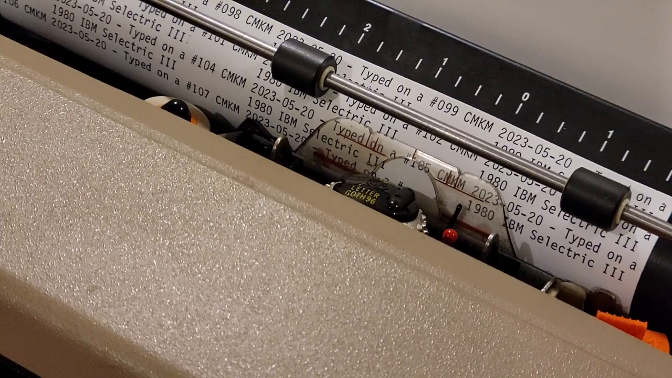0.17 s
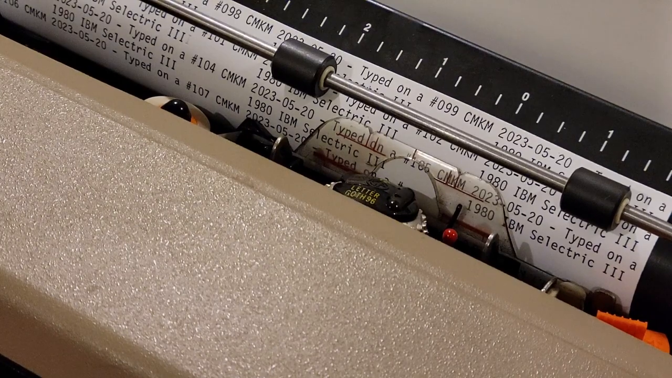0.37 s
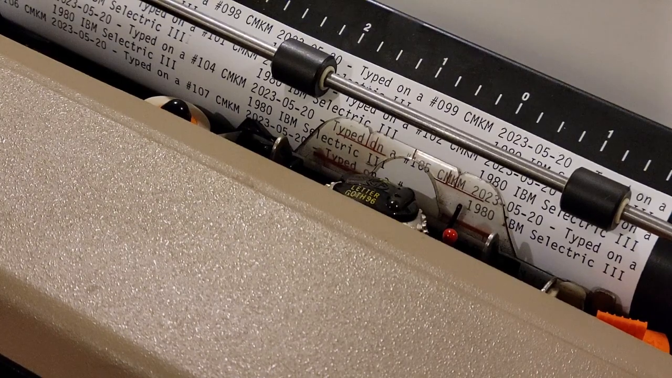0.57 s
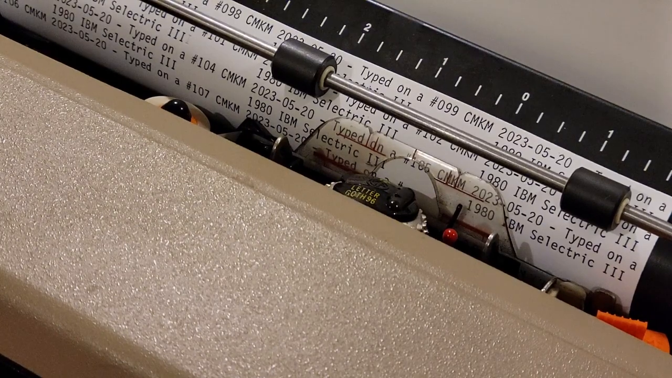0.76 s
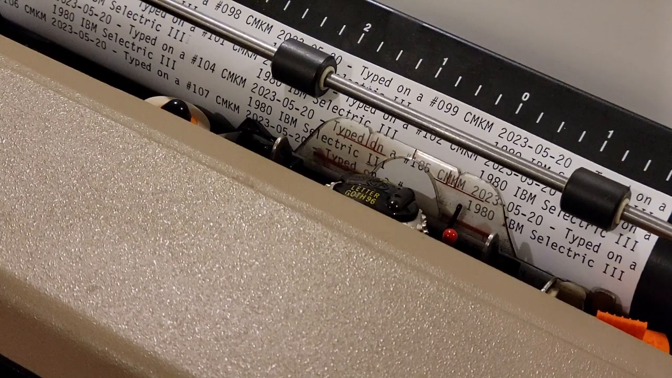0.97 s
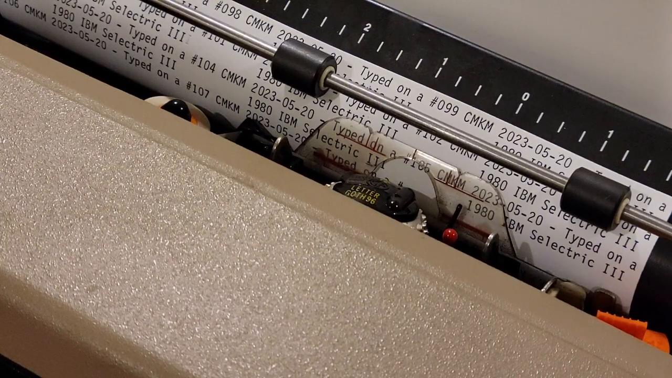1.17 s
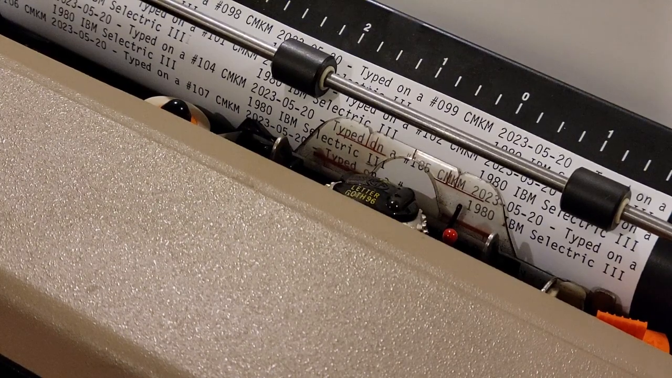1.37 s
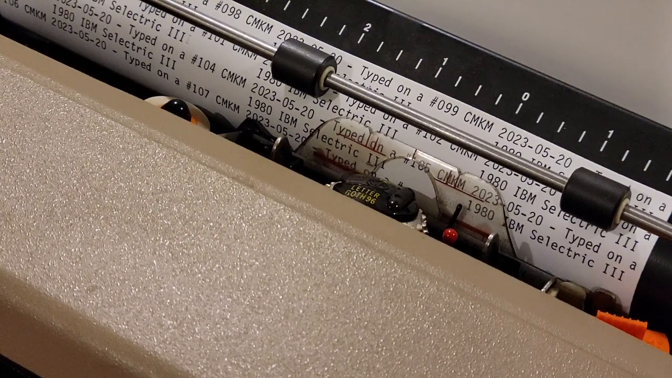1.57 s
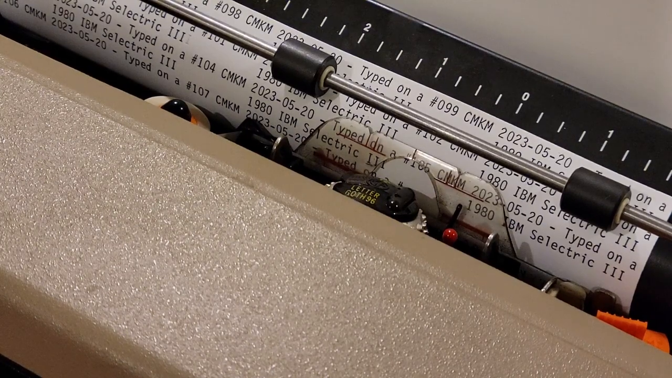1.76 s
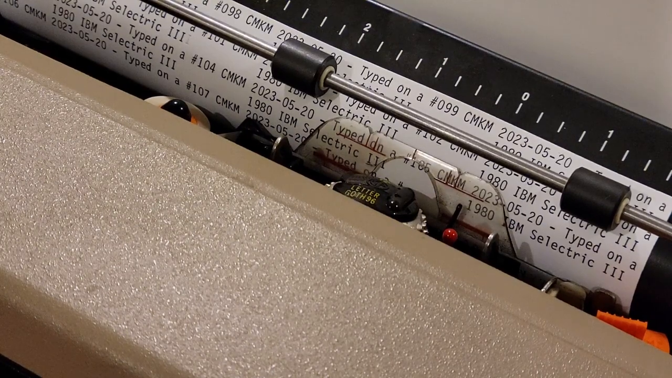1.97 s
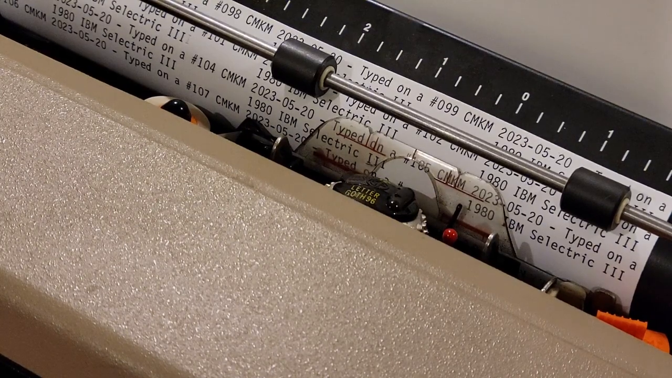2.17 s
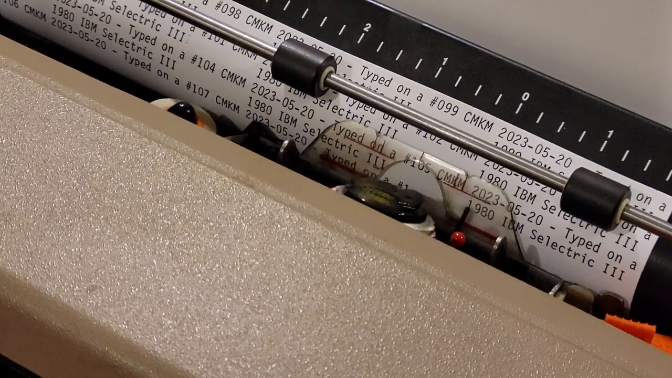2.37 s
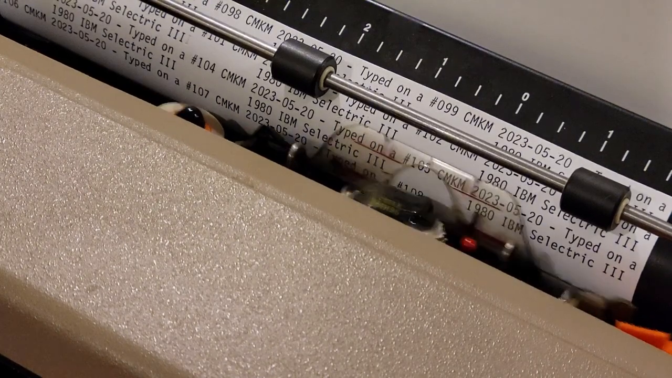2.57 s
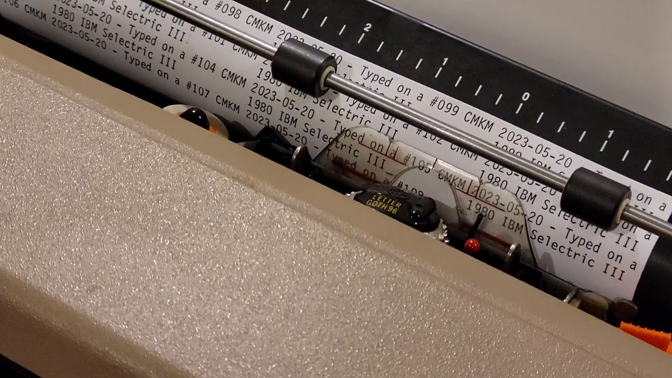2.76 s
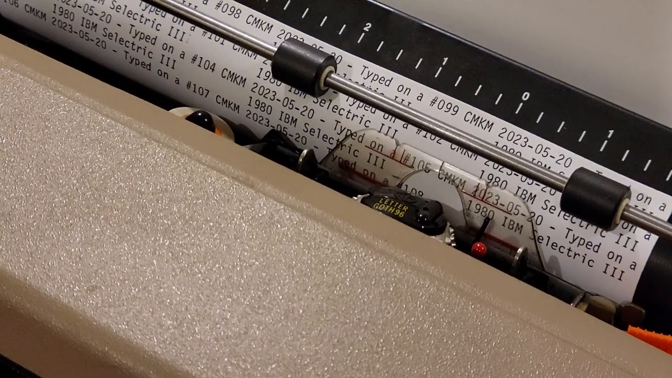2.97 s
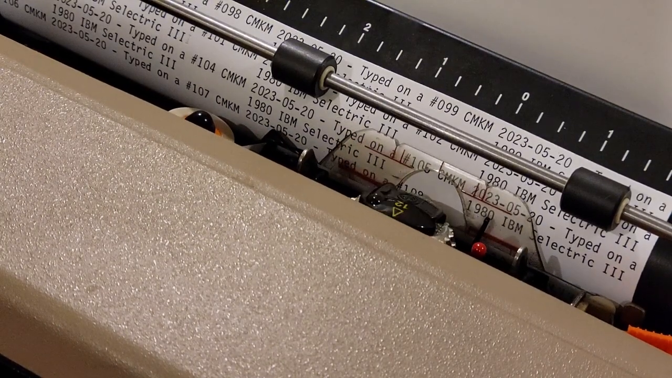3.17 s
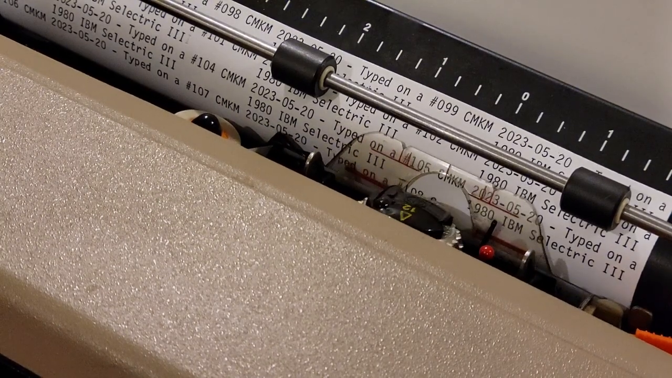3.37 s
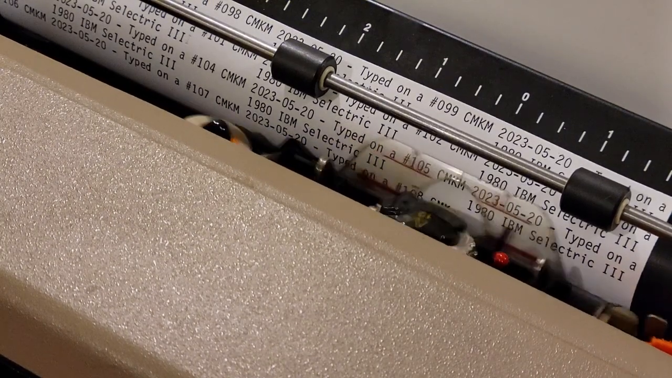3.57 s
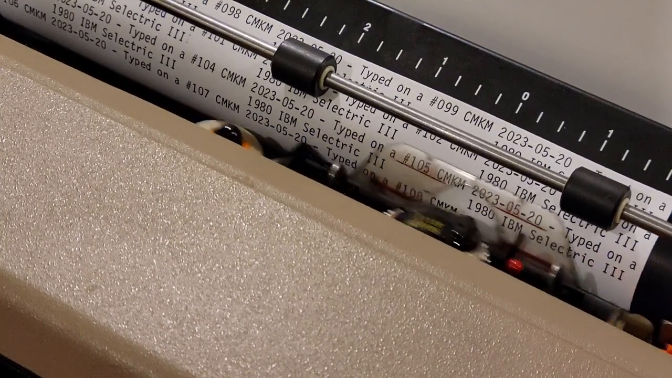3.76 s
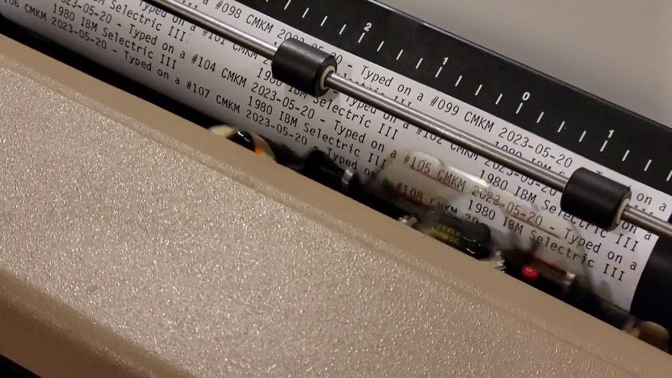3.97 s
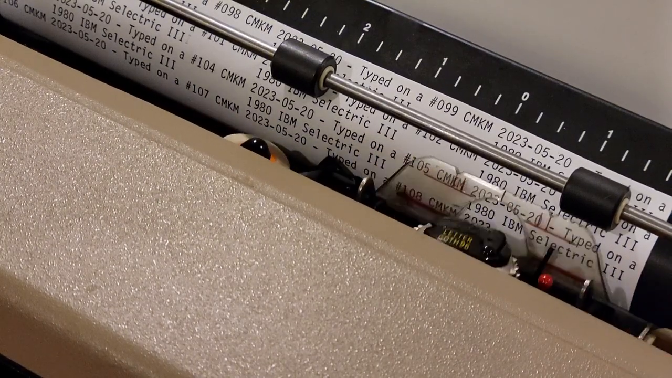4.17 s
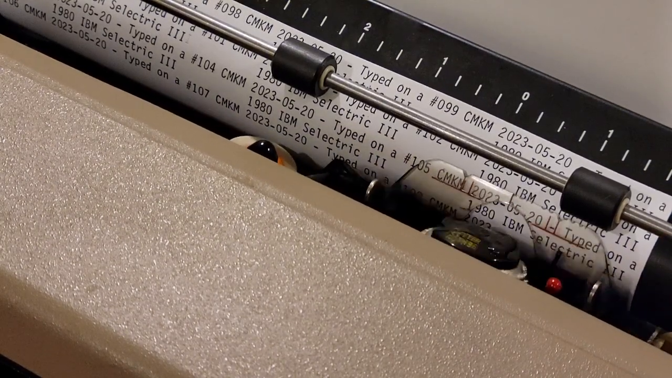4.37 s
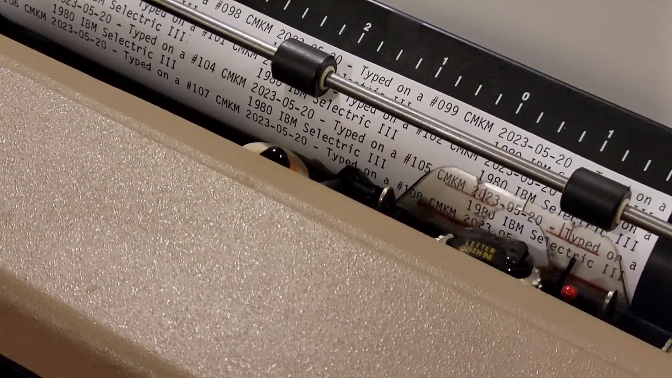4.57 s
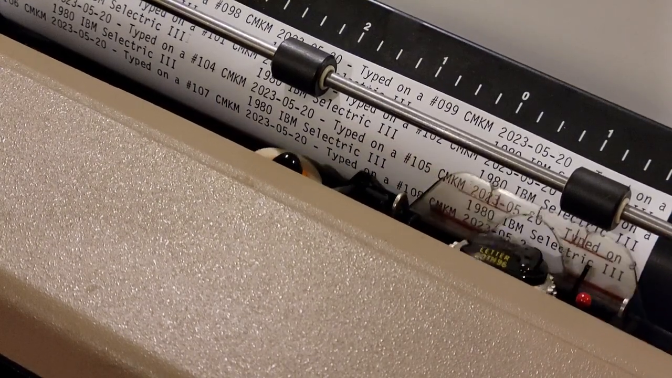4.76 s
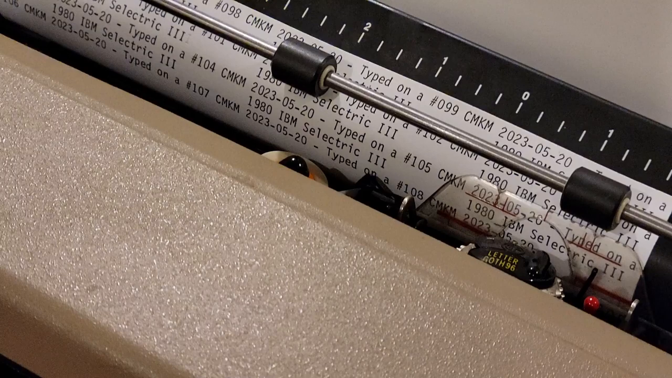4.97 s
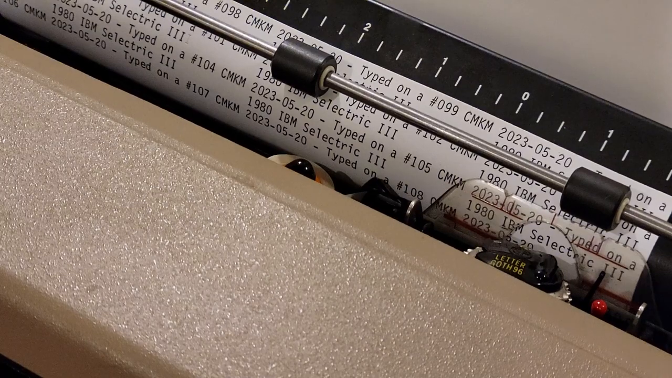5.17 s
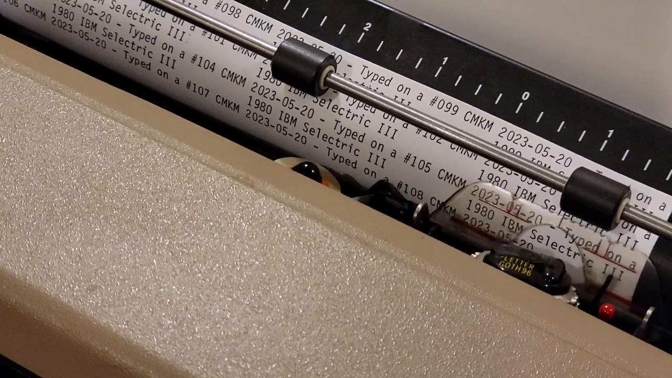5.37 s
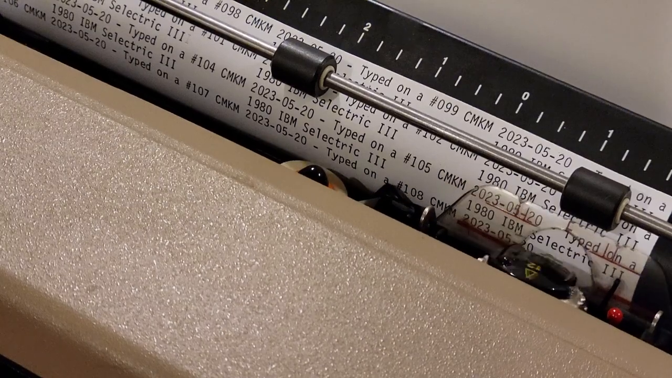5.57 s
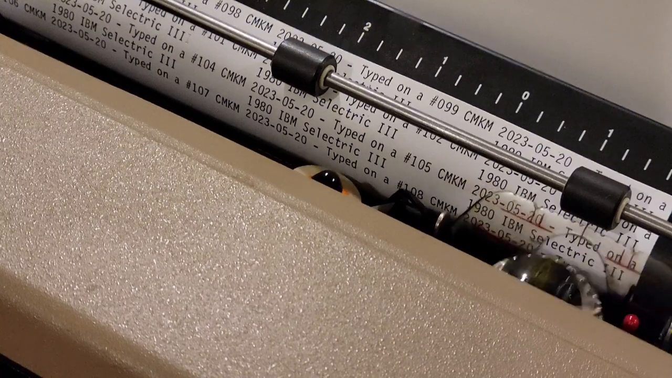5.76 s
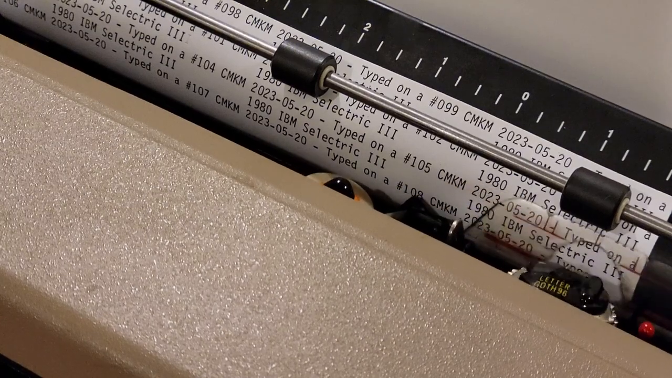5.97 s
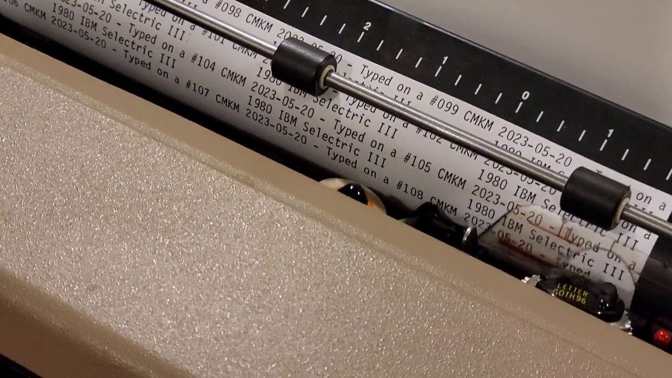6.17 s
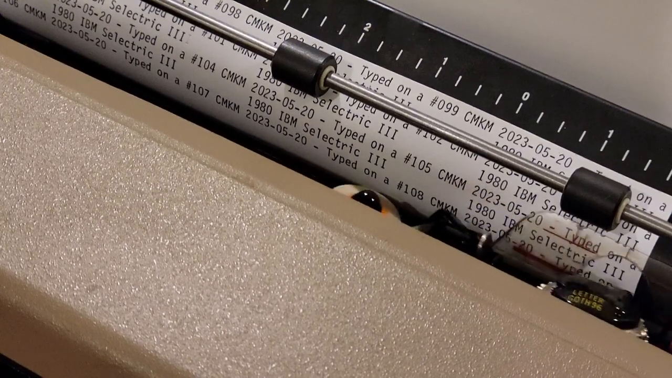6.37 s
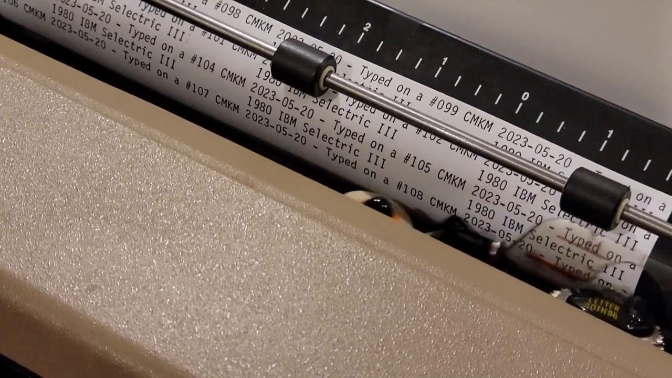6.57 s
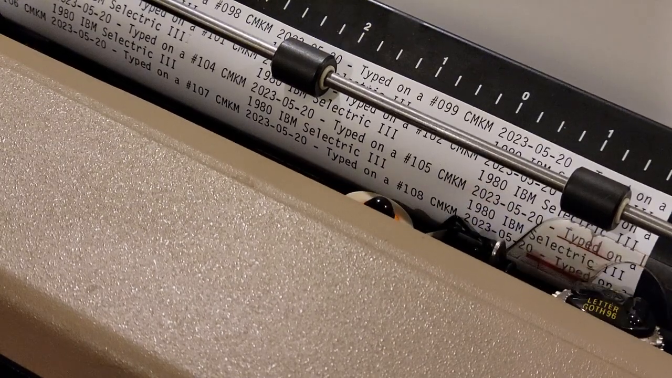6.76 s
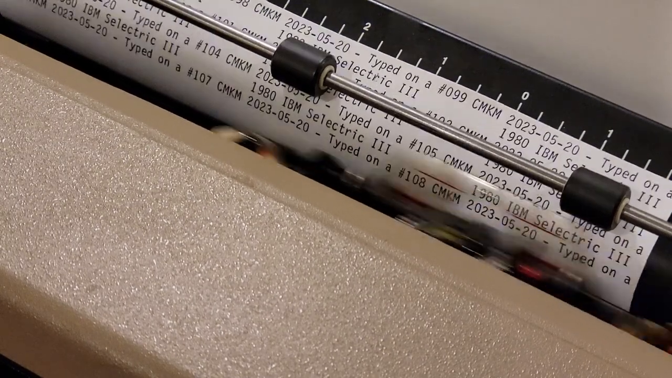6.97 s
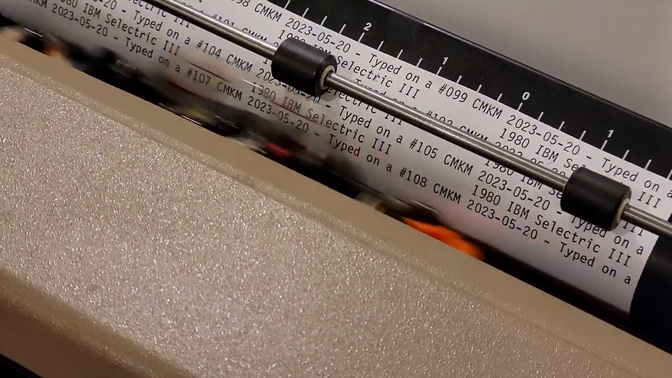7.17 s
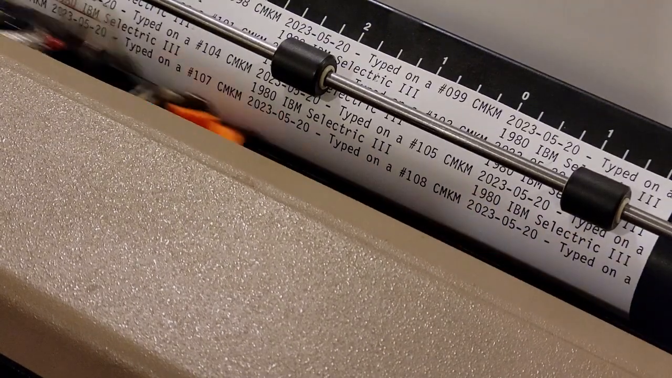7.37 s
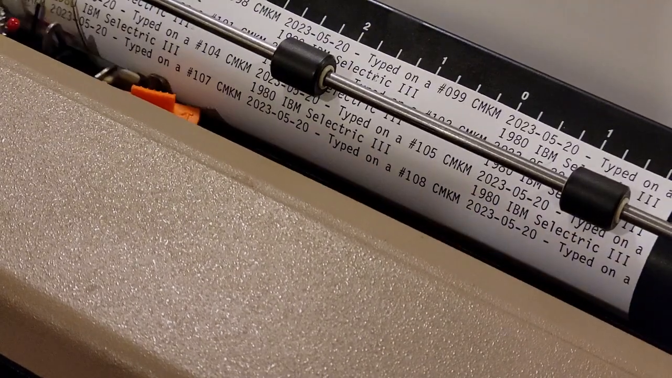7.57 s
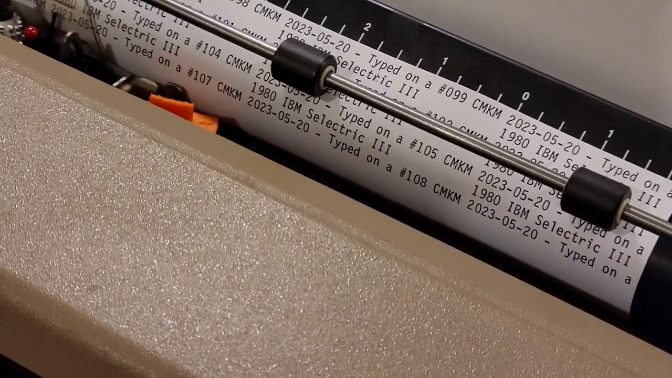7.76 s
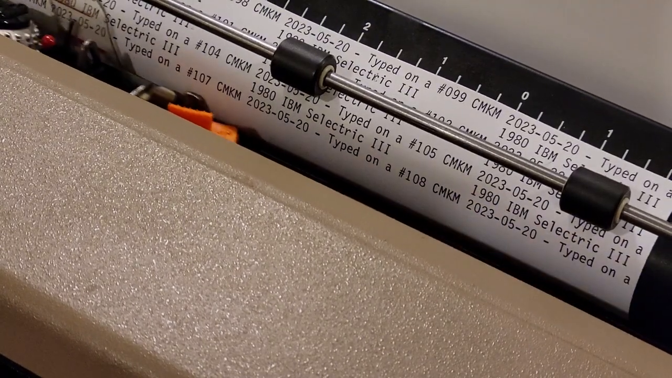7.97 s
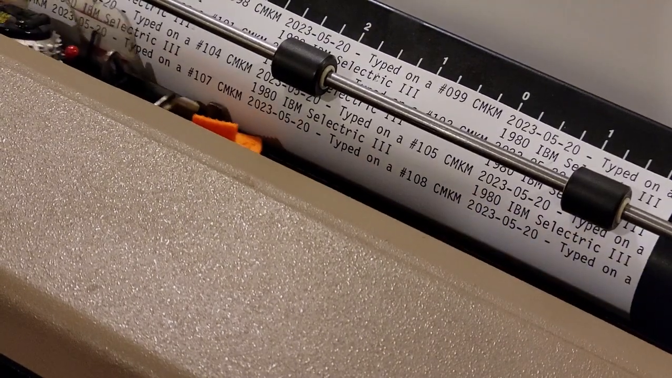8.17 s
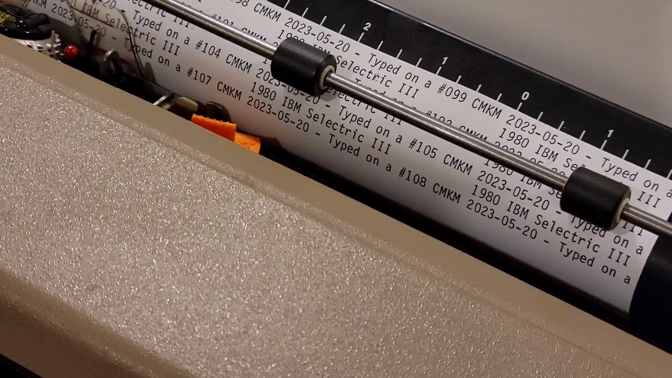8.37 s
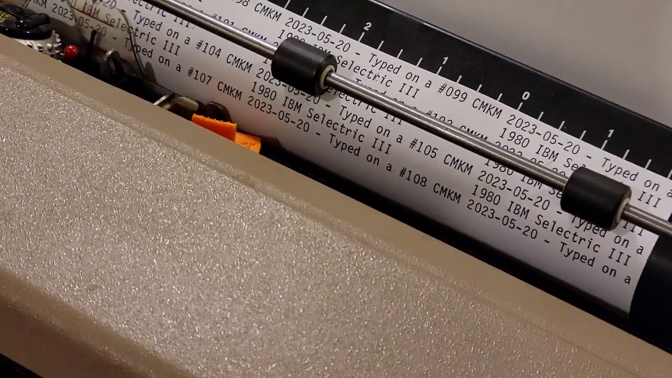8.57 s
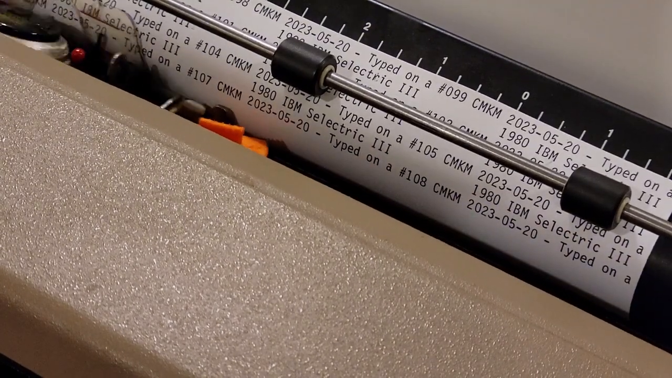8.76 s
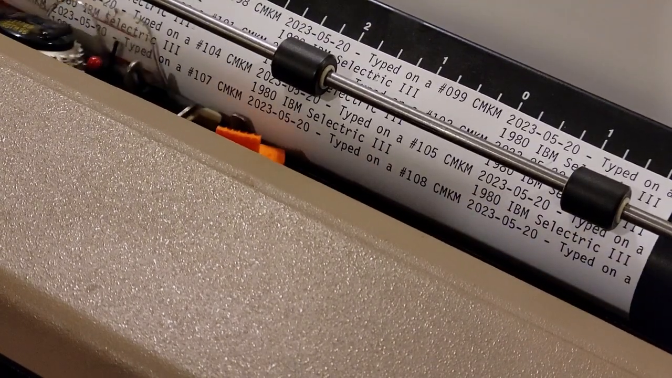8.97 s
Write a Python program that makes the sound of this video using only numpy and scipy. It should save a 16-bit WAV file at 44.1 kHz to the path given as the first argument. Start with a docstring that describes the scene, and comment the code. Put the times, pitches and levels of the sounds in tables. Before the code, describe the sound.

A close stereo perspective on an electric type-ball typewriter in a small room, with a short, quick-fading echo. A steady low motor hum and soft belt and fan rush run throughout. It idles until about 2.3 s, with only a barely audible tick near 0.9 s. Three sharp strikes follow to 2.6 s, then key clicks, a space clack and a ringing shift click near 3.2 s. From 3.35 to 6.6 s typing is dense and uneven: crisp steel snaps, rattling linkages, rubbery knocks, small ball rings and light frame thuds, with spaces between runs. At 6.8 s a key clicks; from 6.9 s the carrier whirs and slides in a rough flutter, clunking at the margin at 7.4 s. From 7.6 to 8.2 s ten even clacks rattle at about sixteen per second. Hum alone until 8.7 s, then four very rapid strikes by 8.95 s, settling into hum.

```python
"""In a small room, an electric type-ball typewriter works close by, its motor and belt humming.
For each character the clutch trips, linkages rattle, the ball hits the platen and the carrier steps on.
After a line the carrier whirs back to the margin, the space bar repeats, and typing resumes.
Clicks and the soft swells before them are short bursts of shaped noise; ringing parts are fading sines.
The motor is steady tones over a rush of air, and fading noise makes the room's echo."""
import sys
import numpy as np
from scipy import signal
from scipy.fft import rfft, irfft, next_fast_len
from scipy.io import wavfile
from scipy.ndimage import map_coordinates

SR = 44100
rng = np.random.default_rng(int(sys.argv[2]) if len(sys.argv) > 2 else 0)


def wav_record(signal):
    """Record a signal, one row per channel, as 16-bit PCM in the file named by sys.argv[1]."""
    frames = np.transpose(np.atleast_2d(signal))
    bounded = np.clip(frames, -1, 1)
    # unit amplitude maps onto the largest positive 16-bit level
    quanta = np.round(bounded * 32767).astype(np.int16)
    wavfile.write(sys.argv[1], SR, quanta)


N = 397782
T = np.arange(N) / SR
AGE = np.arange(SR // 2) / SR  # time since a contact [s]
SWELL_SAMPLES = SR // 40  # length of the swell of noise before a contact

# ways the rubber platen rings: (pitch [Hz], relative level [dB], time to fall 60 dB [s])
PLATEN = [(344.5, -7.5, 0.09), (440, 3, 0.04), (494, -1.5, 0.039), (615, -14.5, 0.042),
          (755, -13.5, 0.0345), (1045, -6.5, 0.029), (1312, -10, 0.053)]
# ways the frame rings: (pitch [Hz], relative level [dB], time to fall 60 dB [s])
FRAME = [(28.6, -16.5, 0.72), (46, -12, 0.42), (77.8, -2, 0.29), (114, -6.5, .13), (154.8, -4, 0.21),
         (270, -6, .1), (322, -2, 0.27), (490, -3.5, 0.15)]

RATTLE_DB = -14  # base level of every character cycle: the motor drives each with the same force
# the return: key down, the cord takes hold, the carrier meets the margin
RETURN_KEY_S, RETURN_PULL_S, RETURN_STOP_S = 6.808, 6.9, 7.437


def amp(db):
    """Turn decibels into gain."""
    return 10 ** (np.asarray(db) / 20)


def unit(x):
    """Scale to an rms of 1."""
    return x / np.sqrt(np.mean(x ** 2) + 1e-20)


def along(points, hz):
    """Read a curve of (frequency [Hz], value) points on a log frequency axis."""
    f, v = np.transpose(points)
    return np.interp(np.log(hz + 1), np.log(f + 1), v)


def wobble(rate, size=N):
    """Draw a smooth random curve with this many random points a second."""
    knots = rng.standard_normal(int(size * rate / SR) + 4)
    return map_coordinates(knots, [np.arange(size) * rate / SR])


def filtered(x, response):
    """Multiply the spectrum of x by a response that depends on frequency."""
    m = next_fast_len(x.shape[-1] + 8192)
    spectrum = rfft(x, m) * response(np.fft.rfftfreq(m, 1 / SR))
    return irfft(spectrum, m)[..., :x.shape[-1]]


def coloured(x, spectrum):
    """Shape white noise or contacts by a spectrum while keeping the power of white noise."""
    return filtered(x, lambda hz: unit(amp(along(spectrum, hz))))


def spread(pair):
    """Turn two unrelated signals into left and right: alike in the bass, unrelated in the treble."""
    # how alike left and right are: (frequency [Hz], likeness [0 to 1])
    likeness = [(30, 0.54), (100, 0.94), (300, 0.88), (600, 0.51), (1200, 0.49), (2500, 0.21),
                (5000, 0.0062), (15000, 0.02)]

    def mid_side_gains(hz):
        turn = np.arccos(np.clip(along(likeness, hz), -1, 1)) / 2
        return np.array([np.cos(turn), np.sin(turn)])

    mid, side = filtered(pair, mid_side_gains)
    return np.array([mid + side, mid - side])


def add(track, s, sound):
    """Mix a sound into a track at time s."""
    start = round(s * SR)
    part = track[..., start:start + sound.shape[-1]]
    part += sound[..., :part.shape[-1]]


def chatter(t60, grain_db=1.5, case_db=-16.5, case_t60=0.11):
    """Steel parts chatter: a burst of tiny uneven contacts, in its own colour, lingers in the case."""
    t = AGE[:SR // 10]
    near, case = rng.standard_normal((2, 2, len(t)))
    resonances = unit(amp(3.2 * wobble(1500, size=len(t) // 2 + 1)))  # a random curve over frequency
    near = irfft(rfft(near) * resonances, len(t))
    grains = unit(amp(grain_db * np.clip(wobble(627, size=len(t)), -2, 2)))
    burst = near * grains * amp(-60 * t / t60)
    burst = burst + case * amp(case_db - 60 * t / case_t60)
    return burst * (1 - np.exp(-t / (0.012 * t60)))  # long rattles also start more softly


def ring(modes, vary_db, detune, attack_s=0.00046):
    """A struck part rings as fading sines, with slightly new strengths and pitches for every blow."""
    hz, db, t60 = np.transpose(modes)[..., None]
    t = AGE[AGE < t60.max()]
    size, pitch = rng.standard_normal((2, len(modes), 1))
    levels = amp(db + vary_db * size - 60 * t / t60)
    waves = levels * np.sin(2 * np.pi * hz * (1 + detune * pitch) * t)
    return waves.sum(axis=0) * (1 - np.exp(-t / attack_s))


def both(modes, vary_db, detune):
    """Ring a part separately for two channels, so that they differ a little."""
    return np.array([ring(modes, vary_db, detune) for _ in range(2)])


def swell_up_to(track, s, db, rise_t60=.04):
    """Soft noise swells briefly up to s."""
    t = AGE[:SWELL_SAMPLES]
    level = amp(3 * wobble(400, size=len(t)) - 60 * t[::-1] / rise_t60)
    noise = rng.standard_normal((2, len(t))) * level
    add(track, s - SWELL_SAMPLES / SR, amp(db) * noise)


def click(steel, linkage, s, bright_db, link_db):
    """One lever clicks: a soft swell of noise, then a bright chatter of steel over a duller one."""
    swell_up_to(steel, s, bright_db - 14)
    add(steel, s, amp(bright_db + 1.5) * chatter(0.026, grain_db=3.5))
    add(linkage, s, amp(link_db + 5.0) * chatter(0.023, grain_db=1.0))


def motor():
    """Slightly unsteady motor tones and mains hum sound over the rush of belt and fan."""
    # tones of motor, belt and mains: (pitch [Hz], level [dB rms])
    hum_tones = [(118.4, -71), (236.9, -47.5), (296.1, -59), (323.0, -60), (355.3, -59), (468.3, -68),
                 (500.6, -68.5), (678.3, -75.5), (705.2, -71.5), (855.9, -82), (1061, -78.5), (1292, -76),
                 (1852, -94.5), (1970, -85)]
    # colour of the rush of air: (frequency [Hz], relative level [dB per Hz])
    air_colour = [(13, -58.5), (22, -27.5), (85, -19), (121, -21.5), (175, -21), (199, -25.5), (216, -20),
                  (235, -10.5), (269, -15.5), (326, -13.5), (385, -24.5), (480, -25.5), (686, -30),
                  (809, -36), (1320, -35.5), (1600, -44.5), (2500, -45.5), (7000, -61), (15800, -64.5)]
    lines = np.zeros(N)
    for hz, db in [*hum_tones, (120, -58.5)]:  # the last is mains hum
        phase = 2 * np.pi * (hz * T + rng.random()) + .12 * wobble(6.8)
        lines += amp(db) * np.sin(phase)
    air = coloured(spread(rng.standard_normal((2, N))), air_colour)
    return np.sqrt(2) * lines + amp(-51) * air


def keys(steel, linkage):
    """Key levers click down, their latches catch just after, and levers spring back."""
    # keys going down: (time [s], relative bright click level [dB], relative linkage level [dB])
    presses = [(2.853, -18, -24), (3.143, -6.5, -10), (3.46, -15.5, -19.5), (4.942, -10.5, -23.5),
               (5.375, -8, -21.5), (5.504, -4.5, -18), (6.808, -6.5, -18), (7.545, -11.5, -16)]
    # key levers springing back: (time [s], relative level [dB])
    releases = [(0.945, -48), (2.531, -8.5), (2.946, -12), (3.762, -11), (3.818, -9), (4.215, -13),
                (4.27, -7.5), (5.051, -12), (5.477, -5.5), (5.558, -6.5), (5.676, -9), (6.474, -11)]
    latch_lag_s, latch_db = .011, -3.5  # after its key, and level relative to it
    for s, db in releases:
        click(steel, linkage, s, db, db - 12)
    for s, click_db, link_db in presses:
        click(steel, linkage, s, click_db, link_db)
        click(steel, linkage, s + latch_lag_s, click_db + latch_db, link_db + latch_db)


def clutch(steel, s, clutch_db):
    """The key lever frees the pawl, then the clutch catches: a swell of noise, a rattle and a click."""
    swell_up_to(steel, s, clutch_db - 25.5, rise_t60=0.055)
    add(steel, s - .006, amp(clutch_db - 11.5) * chatter(0.066))
    add(steel, s + 0.0011, amp(clutch_db + 3.0) * chatter(0.014, grain_db=4.0, case_db=-12.5))


def cycle_rattle(steel, linkage, s):
    """The linkages rattle through one shaft cycle: uneven contacts around the strike at s."""
    # contacts: (time from strike [s], bright level [dB], linkage level [dB], time to fall 60 dB [s])
    # both levels are relative to the cycle's base level
    cycle_contacts = [(-.043, -5, 2, 0.11), (-.035, -1, 3, 0.05), (-.026, 0, -3, 0.092),
                      (-.018, 1.5, -2.5, 0.12), (-.007, 2.5, 4, 0.075), (.001, 1, 1.5, .04),
                      (.014, 5, -0.5, 0.039), (.028, -2.5, -13, 0.061)]
    for delay, bright_db, link_db, t60 in cycle_contacts:
        # each letter needs other latches, so the rattles shift a little in time and force
        at = s + delay + rng.normal(0, .0013)
        db = RATTLE_DB + rng.normal(0, 1.7)
        add(steel, at, amp(db + bright_db + 0.8) * chatter(t60))
        add(linkage, at, amp(db + link_db) * chatter(t60))


def strike(direct, frame, s, platen_db, ball_db):
    """The ball rings as it locks and hits the rubber platen, and the strokes shake the frame."""
    # ways the type ball rings: (pitch [Hz], relative level [dB], time to fall 60 dB [s])
    ball_modes = [(1252, -6.5, 0.038), (2540, 3, 0.022), (2765, 5.5, 0.018), (2935, -3.5, 0.045),
                  (3310, 0.5, .03), (3560, -10.5, .02)]
    add(direct, s - .007, amp(ball_db - 9) * both(ball_modes[2:], vary_db=5.5, detune=.05))  # locks
    add(direct, s - .001, amp(ball_db - 5) * both(ball_modes, vary_db=2.5, detune=.05))
    add(direct, s + 0.00048, -amp(platen_db - 2.1) * ring(PLATEN, vary_db=2.5, detune=.035))
    for delay in (-.032, .004, .026):  # the carrier is jolted as the ball turns, strikes and drops back
        jolt = amp(RATTLE_DB - 16.8) * both(FRAME, vary_db=2.2, detune=0.055)
        add(frame, s + delay + rng.normal(0, .003), jolt)


def characters(steel, linkage, direct, frame):
    """Each shaft cycle trips the clutch, rattles, strikes and lets the escapement step the carrier on."""
    # characters: (time of strike [s], relative platen knock level [dB], relative ball ring level [dB])
    typed = [(2.352, -12.5, -6.5), (2.469, -10, -6), (2.57, -11.5, -11.5), (3.352, -13.5, -7.5),
             (3.507, -14.5, -9), (3.568, -11.5, -6), (3.666, -11, -10.5), (3.91, -11.5, -12),
             (3.973, -11, -13), (4.04, -10.5, -8.5), (4.117, -13.5, -7.5), (4.242, -12, -11.5),
             (4.404, -10.5, -11), (4.528, -13, -10), (4.619, -13.5, -15), (4.732, -10, -12),
             (4.823, -10.5, -9.5), (5.279, -14.5, -14), (5.627, -13, -7), (5.747, -14.5, -11),
             (5.813, -16, -9.5), (5.91, -14.5, -11), (6.053, -12, -7), (6.272, -12, -8.5),
             (6.352, -9, -11.5), (6.566, -17.5, -13), (8.742, -11.5, -24), (8.804, -8, -14.5),
             (8.872, -10, -13), (8.94, -10, -8.5)]
    clutch_lead_s, clutch_db = .0548, -7  # the clutch trips this long before the strike
    chained_s, chained_db = .071, -18.5  # closer strikes keep the clutch engaged, so it only ticks
    escape_lag_s, escape_db = .0205, -10  # the escapement lets the carrier on after each strike
    run_s, run_key_db = .15, -18  # in a fast run the key clicks at some moment before its strike
    strike_times = [row[0] for row in typed]
    gaps = np.diff(strike_times, prepend=0)
    for (s, platen_db, ball_db), gap in zip(typed, gaps):
        clutch(steel, s - clutch_lead_s, chained_db if gap < chained_s else clutch_db)
        cycle_rattle(steel, linkage, s)
        strike(direct, frame, s, platen_db, ball_db)
        escape = amp(escape_db + rng.normal(0, 1.7)) * chatter(0.037, grain_db=1.0)
        add(steel, s + escape_lag_s, escape)
        if gap < run_s:
            click(steel, linkage, s - rng.uniform(.06, .1), run_key_db, run_key_db - 3.5)


def carrier_stops(count=10):
    """List the clacks of spaces, line feed, margin and held space bar as (s, clack dB, thud dB)."""
    # single spaces: (time [s], relative clack level [dB], relative thud level [dB])
    single_spaces = [(2.925, -10, -24.5), (3.729, -15, -23.5), (3.791, -11, -22), (4.187, -16.5, -27),
                     (5.021, -9.5, -26), (5.44, -10, -21.5), (6.158, -10, -32), (6.457, -11, -25)]
    # the platen ratchets on one line: (time [s], relative clack level [dB], relative thud level [dB])
    line_feed = (6.931, -11, -23.5)
    margin = (RETURN_STOP_S, -11.5, -18.5)
    shaft_turn_s = .0621  # the held bar gives one space per turn of the shaft
    held = [(7.614 + k * shaft_turn_s, -9.5, -27) for k in range(count)]
    return [*single_spaces, line_feed, margin, *held]


def carrier_steps(steel, linkage, frame):
    """A lever frees the carrier, then the pawl drops into the rack, stops it and thuds the frame."""
    # contacts: (time from clack [s], bright level [dB], linkage level [dB], time to fall 60 dB [s])
    # both levels are relative to the clack
    step_contacts = [(-.06, -19, -16.5, 0.32), (-.008, 0, -8.5, 0.067), (0, 4, -7.5, 0.024),
                     (.003, -13.5, -11, .03), (.007, -9.5, -8.5, 0.07), (.022, -23, -20, 0.12)]
    # ways the escapement rack rings: (pitch [Hz], relative level [dB], time to fall 60 dB [s])
    rack_modes = [(507, -8, 0.1), (873, -4, 0.043), (1049, 0.5, 0.04), (1120, -1, 0.034), (1348.5, -3, .03),
                  (2700, -12, .02), (4660, 0, .015), (6640, -3.5, .012)]
    for s, clack_db, thud_db in carrier_stops():
        swell_up_to(steel, s + step_contacts[1][0], clack_db - 7.5, rise_t60=.025)
        for delay, bright_db, link_db, t60 in step_contacts:
            add(steel, s + delay, amp(clack_db + bright_db) * chatter(t60, grain_db=0.5))
            add(linkage, s + delay, amp(clack_db + link_db) * chatter(t60))
        add(frame, s + 0.00185, amp(clack_db - 12.5) * both(rack_modes, vary_db=3.5, detune=0.04))
        add(frame, s + 0.00301, amp(thud_db - 8.5) * both(FRAME, vary_db=3.0, detune=.05))
        add(frame, s + 0.00389, amp(thud_db - 6.5) * both(PLATEN, vary_db=6.5, detune=0.039))


def shift(steel, linkage, direct, frame):
    """The shift swings the ball round with a jolt, then it clicks and rings against its stop."""
    # shifts: (time at the stop [s], relative level [dB])
    shifts = [(3.191, -13.5), (5.558, -18.5)]
    # ways the shift stop rings: (pitch [Hz], relative level [dB], time to fall 60 dB [s])
    stop_modes = [(318, -8, .15), (1427, -21, .14), (9545, -21, .2), (14710, -1, .075)]
    for s, db in shifts:
        add(frame, s - .046, amp(db - 16) * both(FRAME, vary_db=3.5, detune=0.041))
        click(steel, linkage, s, db + 2.5, db - 3.0)
        add(direct, s, amp(db) * both(stop_modes, vary_db=0.5, detune=0.0022))


def return_linkage(steel, linkage, frame):
    """The return linkage rattles into gear, the cord takes hold, and the margin stop rings."""
    # ways the carrier rings on the stop: (pitch [Hz], relative level [dB], time to fall 60 dB [s])
    margin_modes = [(477, 0, 0.097), (689, -12, 0.12), (785, -12, 0.139)]
    add(steel, RETURN_KEY_S, amp(-21.0) * chatter(0.44, grain_db=6))
    add(linkage, RETURN_PULL_S - .005, amp(-10) * chatter(0.079, grain_db=1))
    click(steel, linkage, RETURN_PULL_S, -17, -10)
    add(linkage, RETURN_STOP_S - .006, amp(-11) * chatter(0.12))
    add(frame, RETURN_STOP_S - .003, amp(-18) * both(margin_modes, vary_db=2.5, detune=0.0099))


def carrier_return():
    """The cord hauls the carrier along its rail; the drum whirs in uneven pulses as the drive turns."""
    # colour of the sliding carrier and cord: (frequency [Hz], relative level [dB per Hz])
    cord_colour = [(60, -24.5), (150, 1), (210, -6.5), (400, -5), (500, 0.5), (700, -12.5), (850, -8),
                   (1060, -4), (1400, -13.5), (1900, -18), (2580, -13), (3200, -24), (6000, -31),
                   (15000, -53)]
    slide_db, jerk_db, jerk_s = -44, 13, 0.04  # steady slide; louder at the first pull, then settling
    take_up_db_per_s, stop_db_per_s = 70, 900  # grows as slack is taken up, dies at the margin
    turn = np.sin(2 * np.pi * 28.3 * T + .9 * wobble(25))  # 28.3 Hz, a little uneven
    slide = coloured(spread(rng.standard_normal((2, N))), cord_colour) * amp(2.0 * turn)
    drum_noise = spread(rng.standard_normal((2, N)))
    drum = unit(filtered(drum_noise, lambda hz: 1 / (1 + ((hz - 2600) / 200) ** 4)))  # near 2600 Hz
    before = np.maximum(RETURN_PULL_S - T, 0)
    pulled = np.maximum(T - RETURN_PULL_S, 0)
    stopped = np.maximum(T - RETURN_STOP_S, 0)
    level_db = slide_db + jerk_db * np.exp(-pulled / jerk_s)
    level_db = level_db - take_up_db_per_s * before - stop_db_per_s * stopped
    return (T > RETURN_KEY_S) * amp(level_db) * (slide + drum * amp(-7.0 + 3.5 * turn))


def mechanism():
    """Gather all contacts and blows, and give steel parts and linkage their own colours."""
    # colour of the bright steel parts: (frequency [Hz], relative level [dB per Hz])
    steel_colour = [(200, -29), (800, -1), (1100, 0.5), (1900, -3), (5000, 1.5), (6800, 1.5), (8000, -2),
                    (11000, -2.5), (13000, 1.5), (15800, 1)]
    # colour of the duller linkage: (frequency [Hz], relative level [dB per Hz])
    linkage_colour = [(60, -7), (140, -5.5), (210, -10.5), (310, 4.5), (500, -1), (720, 0), (1000, -3.5),
                      (1340, 4.5), (1650, -8), (2200, -2.5), (2900, 3.5), (3900, -9.5), (7000, -22),
                      (16000, -43)]
    steel, linkage, direct, frame = np.zeros((4, 2, N))
    keys(steel, linkage)
    characters(steel, linkage, direct, frame)
    carrier_steps(steel, linkage, frame)
    shift(steel, linkage, direct, frame)
    return_linkage(steel, linkage, frame)
    bright = amp(-1.5) * coloured(steel, steel_colour)
    dull = amp(-6) * coloured(linkage, linkage_colour)
    return direct + spread(bright + dull + frame)


def echo(x):
    """The room answers with fading noise, drawn anew for every quarter second of sound."""
    # how long the room rings: (frequency [Hz], time to fall 60 dB [s])
    room_decay = [(80, 0.89), (260, 0.24), (1800, 0.25), (5000, 0.24), (13000, 0.19)]
    linger_db, linger_times = -29.5, 3.76  # a faint part of the tail lasts this many times longer
    out, block = np.zeros((2, N)), SR // 4
    for start in range(0, N, block):
        hz, t, noise = signal.stft(rng.standard_normal((2, SR // 2)), SR, nperseg=256)
        fall_db = -60 * t / along(room_decay, hz)[:, None]
        fading = noise * (amp(fall_db) + amp(linger_db + fall_db / linger_times))
        tail = spread(signal.istft(fading, SR, nperseg=256)[1])
        tail = tail / np.linalg.norm(tail[0])
        answer = signal.fftconvolve(x[:, start:start + block], tail, axes=1)
        add(out, start / SR + .006, answer)  # the echo starts 6 ms late
    return out


def scene():
    """The mechanism clatters over its motor, a shade nearer the right, and the room answers."""
    # balance between the sides: (frequency [Hz], left minus right [dB])
    side_balance = [(60, -3.5), (130, -2), (290, -0.5), (640, -0.5), (1410, -2.5), (3100, 0.0), (6820, 0.5),
                    (15000, -0.5)]
    machine = mechanism()
    sound = motor() + machine + carrier_return() + amp(-6.0) * echo(machine)
    delay_s = np.array([[.00004], [0]])  # the left side hears it slightly later

    def placement(hz):
        gains = amp(along(side_balance, hz) * np.array([[.5], [-.5]]))
        return gains * np.exp(-2j * np.pi * hz * delay_s)

    return filtered(sound, placement)


def record(dry):
    """Round off the highest peaks and keep nothing above the band limit."""
    top_hz = 16100
    rounded = dry / (1 + (dry / .95) ** 4) ** (1 / 4)
    return filtered(rounded, lambda hz: np.clip((top_hz - hz) / 250, 0, 1) ** 2)


dry = scene()
out = record(dry)
wav_record(out)
```